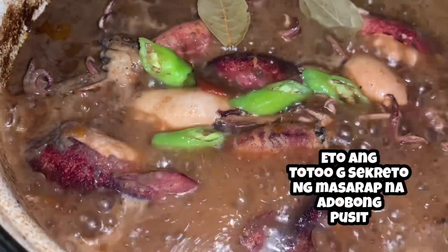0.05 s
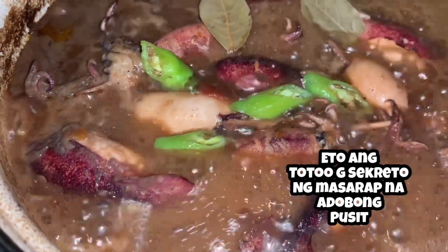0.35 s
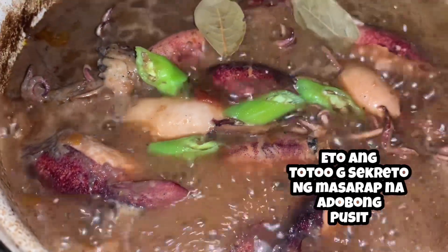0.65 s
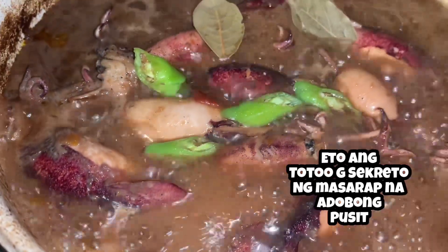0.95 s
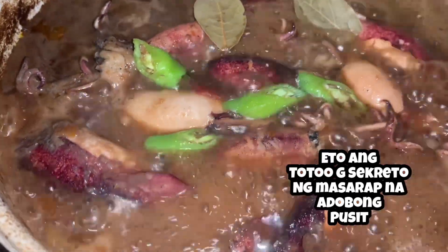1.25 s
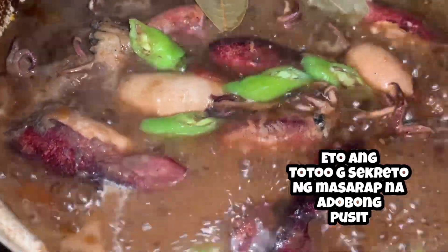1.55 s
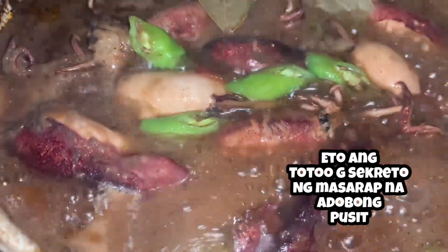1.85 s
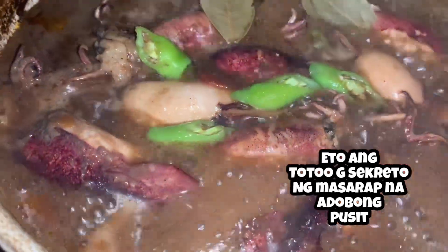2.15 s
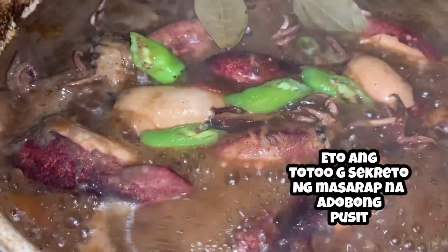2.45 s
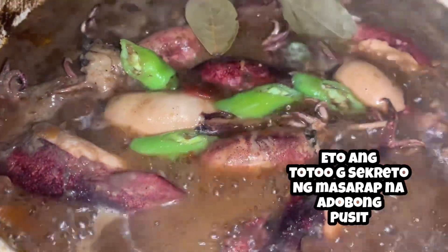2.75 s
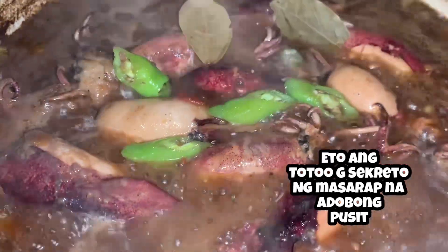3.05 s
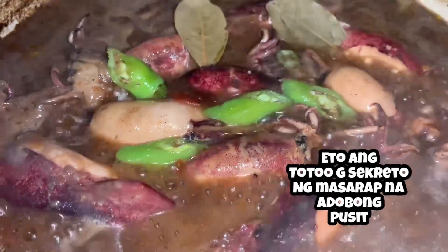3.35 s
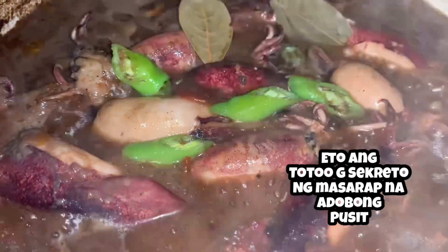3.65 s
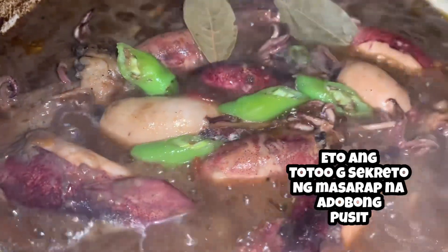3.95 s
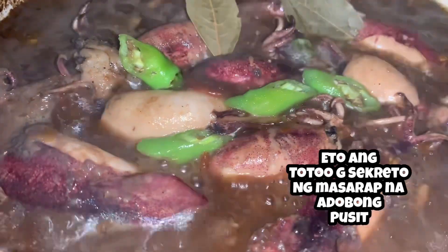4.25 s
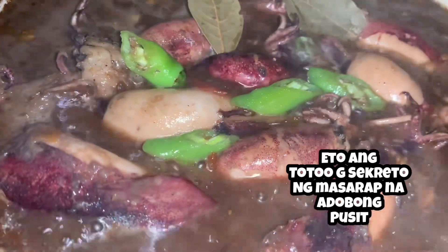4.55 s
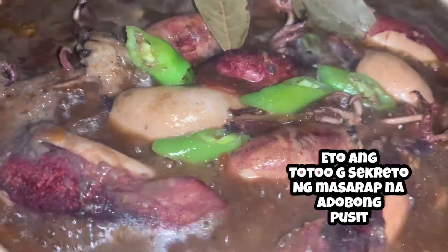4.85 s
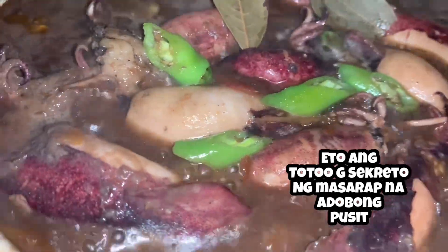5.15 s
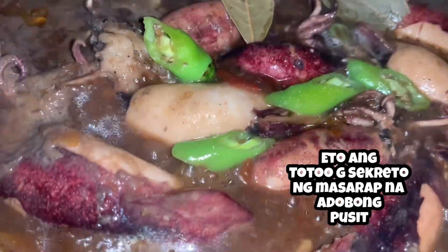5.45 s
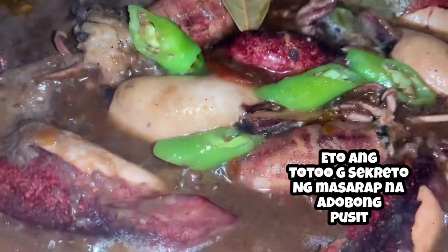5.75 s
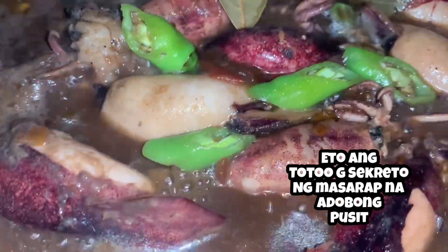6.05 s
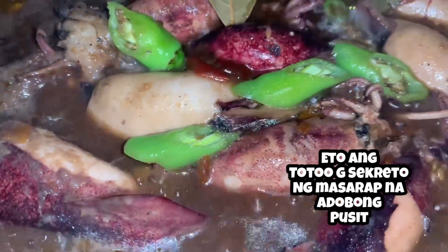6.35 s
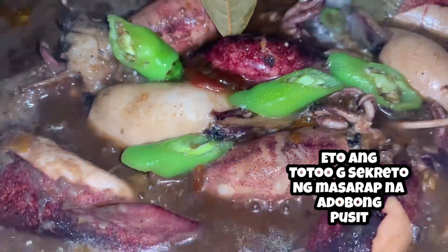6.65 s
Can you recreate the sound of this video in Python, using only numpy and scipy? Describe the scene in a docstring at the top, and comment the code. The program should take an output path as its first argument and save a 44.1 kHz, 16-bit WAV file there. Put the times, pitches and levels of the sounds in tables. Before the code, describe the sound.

A thick stew bubbles, sizzles and crackles in a metal pot, heard close up in a kitchen with little echo. A burner rumbles low throughout, humming slightly in the first second. Wet pops stand out from the boil at first. At 0.8 seconds a utensil clinks once on the pot with a short, bright ring. Around 1.3 seconds steam gushes through the sauce in a quick run of soft, deep thumps and pops. From about 2 seconds the boil eases and the bubbling thins, leaving a faint hollow steam sound and tiny sharp spits. Single soft puffs come near 3.2 and 4.3 seconds. From 4.6 seconds one spot in the sauce blurps and gurgles quietly, nearly four times a second, until the end at about 6.8 seconds. At 6.5 seconds a small, faint jet of steam sputters out.

```python
"""A stew bubbles, sizzles and crackles in a metal pot over a rumbling burner, close to two microphones.
At 0.8 s a utensil clinks on the pot, and at 1.3 s steam gushes through the sauce with soft thumps.
The bursting bubbles then thin out as the boil eases. From 4.6 s one vent in the sauce blurps and
gurgles at a nearly even pace, and at 6.5 s a small jet of steam escapes."""
import sys
import numpy as np
from scipy import signal
from scipy.fft import rfft, irfft, next_fast_len
from scipy.io import wavfile

SR = 44100
rng = np.random.default_rng(int(sys.argv[2]) if len(sys.argv) > 2 else 0)


def log_audio(samples):
    """Write samples as a 16-bit WAV file to the path given in sys.argv[1]."""
    # one column per channel
    frames = np.atleast_2d(samples).T
    # limit to full scale, then quantise
    limited = np.clip(frames, -1, 1)
    pcm = np.round(limited * 32767).astype(np.int16)
    wavfile.write(sys.argv[1], SR, pcm)


N = 300302
TIME = np.arange(N) / SR


# How hard the sauce bubbles, stalling and picking up again: time_s, level_db
SAUCE_LEVEL = [(0, -46.5), (1.35, -49.5), (2.1, -53), (2.8, -56.5), (3.2, -63), (3.7, -71.5), (4.25, -66.5),
               (4.6, -63.5), (5.0, -61), (5.4, -62.5), (6.1, -63), (6.81, -67.5)]
# Its tone, from low to high: frequency_hz, level_db
SAUCE_TONE = [(120, -11), (250, -2.5), (320, 3.5), (400, 0.5), (520, 3), (680, 3.5), (850, -1),
              (1300, -3.5), (2000, -5.5), (3000, -27), (5000, -60), (9000, -48)]
def bubbling():
    """Thick sauce cuts each bubble's ring short; a soft wash seethes underneath."""
    bubbles = swarm(np.linspace(280, 2800, 20), per_s=1300, spread_db=2, cycles=1.3, scatter_s=0.00019)
    sauce = coloured(bubbles, SAUCE_TONE) + amp(-2) * coloured(pair_noise(apart_db=6), SAUCE_TONE)
    sauce = patchy(sauce, depth_db=3, width_hz=180, length_s=0.078)
    return amp(2.5) * follow(SAUCE_LEVEL) * level_changes() * sauce


# The sound's level briefly swells, or drops out for a moment: middle_s, half_length_s, change_db
LEVEL_CHANGES = [(0.656, 0.025, 2.5), (1.292, 0.037, 2), (1.392, 0.023, 5), (2.964, 0.031, -17),
                 (4.228, 0.019, -15), (4.4, 0.025, -12), (4.542, 0.027, 4), (5.43, 0.05, 2.5)]
def level_changes():
    """These brief changes as one volume curve."""
    return amp(sum(db * hump(middle, half, power=4) for middle, half, db in LEVEL_CHANGES))


# Strength of the boil, easing as the pot cools: time_s, level_db
BOIL_LEVEL = [(0.0, -53), (1.42, -56), (2.43, -59.5), (5.31, -67.5), (6.54, -66.5), (6.81, -68)]
# Tone of the sizzle: frequency_hz, level_db
SIZZLE_TONE = [(700, -40), (1300, 10.5), (2000, 3), (3000, 5.5), (4000, 6), (5500, 5), (7500, 0),
               (9000, -3), (10800, -4.5), (13000, -4.5), (15500, -2.5), (17000, -1.5)]
def sizzle(full_boil_db=-55.5):
    """Countless tiny bubbles merge into a hiss, with short wet crackles in it."""
    boil = follow(BOIL_LEVEL) / amp(full_boil_db)
    crackles = swarm(np.linspace(1500, 5000, 10), per_s=500, spread_db=4, cycles=1.04, scatter_s=3e-5)
    hiss = coloured(pair_noise(apart_db=-42.5), SIZZLE_TONE)
    sound = patchy(unit(hiss + amp(-15) * unit(crackles)), depth_db=2.4, width_hz=500, length_s=0.07)
    return amp(-48.5 + 1.9 * wander(rate_hz=30)) * boil ** 1.12 * level_changes() ** 0.24 * sound


# Crackle of the finest bubbles, strongest at a medium boil: time_s, level_db
FIZZ_LEVEL = [(0, -64.5), (1.2, -56.5), (2.8, -58), (3.9, -66.5), (5.1, -73.5), (6.81, -80)]
# Its tone: frequency_hz, level_db
FIZZ_TONE = [(1500, -19.5), (3500, 2), (5500, 3), (7500, 4.5), (9000, -17), (10800, 8), (13000, 3),
             (15500, 9), (17000, -12.5)]
def fizz():
    """Tiny bubbles crackle in clumps: an even fizz when strong, a few uneven ticks when weak."""
    level = follow(FIZZ_LEVEL)
    strength = level / level.mean()
    clumps = amp(3.3 * wander(rate_hz=21))
    clicks = swarm(np.linspace(4500, 16000, 20), per_s=1200 * strength * clumps,
                   spread_db=3.1 - 0.6 * np.log(strength), cycles=1, scatter_s=1e-5)
    return amp(5) * level.mean() * coloured(clicks * np.sqrt(clumps * strength), FIZZ_TONE)


# Wet pops that stand out of the sauce: start_s, level_db, pitch_hz
POPS = [(0.095, -37, 1270), (0.202, -30, 1310), (0.369, -32, 1600), (0.48, -33, 1440), (0.5495, -33, 1280),
        (0.629, -32, 1360), (1.1, -34.5, 1200), (1.211, -31.5, 1440), (1.258, -32, 993), (1.29, -26, 902),
        (1.323, -28, 950), (1.356, -37, 1240), (1.377, -28, 945), (1.794, -39, 1260), (2.572, -39, 1540),
        (4.036, -45.5, 1630), (4.447, -48.5, 1540), (4.4945, -42, 1580), (4.539, -44, 1310),
        (5.168, -55, 1050), (5.188, -43, 1050), (5.279, -53, 1040), (6.067, -46, 1320)]
def pops(snap_s=0.0015, mist_s=0.0051):
    """A bubble's skin tears with a snap, followed by a fainter mist of droplets."""
    out, t = np.zeros((2, N)), np.arange(400) / SR
    fade = amp(-4) * np.exp(-t / snap_s) + amp(-17) * np.exp(-t / mist_s)
    for start, db, hz in POPS:
        spray = rng.standard_normal(len(t)) * fade
        spray[0] = 1
        pop = signal.fftconvolve(bubble(hz, cycles=0.57), spray[None], axes=1)
        add(out, start, amp(db + 1.5) * pop / abs(pop).max())
    return out


# The sharpest snaps of tiny bubbles: start_s, level_db, pitch_hz
SPITS = [(0.101, -38.5, 8050), (0.276, -39.5, 8400), (0.3388, -35.5, 8800), (0.4767, -34.5, 9840),
         (0.6287, -46, 5700), (0.761, -37.0, 8400), (1.21, -40, 10800), (1.3045, -50, 6700),
         (1.3856, -41, 13600), (1.4584, -42, 12700), (1.599, -44, 8100), (1.6984, -37, 12100),
         (1.9538, -37, 10500), (2.0612, -37.5, 12200), (2.3328, -41, 13100), (2.588, -47, 9600),
         (2.6371, -47, 11200), (2.7738, -37, 7250), (2.8363, -39, 13000), (2.8635, -38.0, 13800),
         (3.0216, -34, 12000), (3.0467, -40, 9400), (3.1367, -40, 7900), (3.1483, -41, 13800),
         (3.224, -41.0, 12600), (3.452, -46, 8950), (3.487, -40, 9300), (3.5217, -38.5, 6640),
         (3.5525, -48, 11800), (3.5579, -37.5, 6540), (3.5631, -50, 12700), (3.5836, -41, 12700),
         (3.5945, -45, 8200), (3.6266, -41.5, 12600), (3.782, -47, 13000), (3.7857, -44, 13200),
         (3.8009, -50, 12800), (3.8419, -42.5, 11700), (3.899, -38.5, 6960), (3.9659, -45, 11000),
         (4.004, -37, 7200), (4.181, -37.5, 12200), (4.2112, -45, 6200), (4.2265, -43, 12500),
         (4.2716, -44.5, 11800), (4.3136, -43, 7700), (4.3671, -46, 14700), (4.498, -44.5, 5840),
         (4.6338, -41, 10900), (4.6559, -43, 13200), (4.7242, -43, 9800), (4.7324, -39.5, 7500),
         (4.805, -47, 10100), (4.9045, -39.5, 12700), (5.1494, -51, 8700), (5.1874, -43.5, 11200),
         (5.2296, -50, 12700), (5.3879, -42.5, 9200), (5.4345, -46.5, 12200), (5.4494, -47, 13100),
         (5.4651, -54, 12900), (5.542, -38, 8800), (5.5987, -48, 14300), (5.6809, -41.5, 9600),
         (5.761, -40, 6100), (5.824, -44.5, 14400), (5.9193, -46, 14200), (5.9545, -39, 10600),
         (6, -52, 7220), (6.1185, -45.0, 13200), (6.1849, -41.0, 8800), (6.294, -48, 11900),
         (6.336, -45, 14600), (6.36, -43, 9100), (6.4055, -43, 10300), (6.4662, -43.5, 12200),
         (6.5777, -51, 14300), (6.6251, -44, 11200), (6.635, -45, 5500)]
def spits(snap_s=0.00015, mist_s=0.003, blur_per_s=350, blur_s=0.012, echo_s=0.0022, scatter_s=1.2e-5):
    """A sharp tick with a faint crackly blur around it; mist follows, and the pot wall echoes it."""
    out, t, f = np.zeros((2, N)), np.arange(-512, 1536) / SR, np.fft.rfftfreq(2048, 1 / SR)
    fade = np.exp(-abs(t) / snap_s) + amp(-22) * np.exp(-abs(t) / mist_s)
    for start, db, hz in SPITS:
        spray, chance = rng.standard_normal(len(t)), rng.random(len(t))
        side, wall = rng.uniform(-1, 1, 2)
        snap = 2 * (t == 0) + (t > 0) * spray * fade
        blur = (chance < blur_per_s / SR) * spray * amp(-9) * np.exp(-abs(t) / blur_s)
        band = (f < TOP_HZ) / (1 + (2 * np.log((f + 1) / hz)) ** 2)
        # Give every snap the same energy before its own level is set.
        scale = np.sqrt(SR / 2000) / np.linalg.norm(irfft(rfft(snap) * band))
        echo = amp(-12) * np.exp(-2j * np.pi * f * echo_s * (1 + wall / 2))
        right_delay = np.exp(-2j * np.pi * f * np.array([[0], [side * scatter_s]]))
        tick = irfft(rfft(snap + 2 * blur) * band * (1 + echo) * right_delay)
        add(out, start + t[0], amp(db + 0.8) * scale * tick)
    return out


# Large bubbles letting out steam: time_s, level_db, pitch_hz
PUFFS = [(1.244, -18, 137), (1.2685, -20.5, 169), (1.295, -18.5, 250), (1.303, -18.5, 119),
         (1.313, -21, 170), (1.3295, -17, 213), (1.383, -15.5, 260), (1.3873, -14, 114),
         (1.398, -13.5, 67.5), (1.967, -34, 188), (3.148, -33, 140), (3.1724, -20.5, 447),
         (3.1735, -28, 211), (3.177, -26, 100), (3.389, -42.5, 296), (3.648, -33.5, 218),
         (4.3336, -32.5, 290), (4.3395, -22, 131)]
def puffs(events=PUFFS, length_cycles=0.71, sag_cycles=3, right_lead_s=0.00015, swirl_s=0.012):
    """Each puff is a short push of air whose pitch sags, with a brief noisy swirl behind it."""
    out, t = np.zeros((2, N)), np.arange(SR // 10) / SR
    for when, db, hz in events:
        turns = np.arange(-2, 2, hz / SR) + np.array([[0], [right_lead_s * hz]])
        sagging = sag_cycles * (1 - np.exp(-turns / sag_cycles))
        push = -np.exp(-(turns / length_cycles) ** 2) * np.sin(2 * np.pi * sagging)
        add(out, when - 2 / hz, amp(db) * push)
        noise = pair_noise(apart_db=-4, size=len(t))
        swirl = unit(filtered(noise, lambda f: (f / hz) / (1 + (f / hz) ** 4)))
        add(out, when, amp(db - 18) * swirl * np.exp(-t / swirl_s))
    return out


# Blurps from one vent in the sauce: time_s, level_db, pitch_hz
BLURPS = [(4.579, -44, 277), (4.862, -42, 355), (5.105, -48, 330), (5.368, -42, 387), (5.635, -44, 260),
          (5.887, -39, 258), (6.177, -39, 302), (6.439, -43, 230), (6.714, -43.5, 241)]
def blurps():
    """The vent lets out one small puff after another."""
    return puffs(BLURPS)


# Tone of the gurgle around each blurp: frequency_hz, level_db
GURGLE_TONE = [(130, -3), (220, -7), (420, 11), (650, -4), (1000, -5), (1800, -19)]
# Pockets of steam under the food: middle_s, half_length_s, level_db, pitch_hz, width_hz
STEAM_POCKETS = [(0.551, 0.0037, -38, 900, 1000), (0.656, 0.03, -39.5, 1140, 880),
                 (0.657, 0.014, -45, 3050, 1500), (1.298, 0.057, -42.5, 990, 260),
                 (5.183, 0.025, -58, 1140, 500), (5.284, 0.03, -60, 1130, 400),
                 (5.429, 0.021, -51.5, 477, 110), (5.51, 0.06, -64, 750, 500)]
def gurgle(late_s=0.012):
    """Each blurp stirs up smaller bubbles and spray; pockets of steam sputter on their own."""
    stirred = sum(amp(db) * hump(when + late_s, half_s=0.024) for when, db, _ in BLURPS)
    bubbles = swarm(np.geomspace(200, 1100, 10), per_s=1200, spread_db=0, cycles=1, scatter_s=0.00016)
    spray = pair_noise(apart_db=3) * amp(14 - 2.5 * wander(rate_hz=85))
    froth = unit(bubbles) + spray
    out = amp(-15) * stirred * coloured(froth, GURGLE_TONE)
    for middle, half, db, hz, width in STEAM_POCKETS:
        sputter = unit(filtered(froth, lambda f: 1 / (1 + (2 * (f - hz) / width) ** 4)))
        out += amp(db) * hump(middle, half) * sputter
    return out


# The deep throb of the gush: frequency_hz, level_db
GUSH_TONE = [(30, -12), (60, -0.5), (130, -7.5), (200, -6.5), (300, -10), (480, -8.5), (1000, -42),
             (2500, -60)]
def gush():
    """Steam heaves through the sauce in a quick run of large, soft bubbles."""
    bubbles = swarm(np.geomspace(70, 320, 5), per_s=270, spread_db=2, cycles=0.99, scatter_s=0.00015)
    return amp(-25.5) * hump(middle_s=1.32, half_s=0.068, power=4) * coloured(bubbles, GUSH_TONE)


# A faint metallic rise leads into the clink: start_s, level_db, brightness_hz, rise_s
CLINK_PARTS = [(0.805, -12, 5000, 0.0017), (.8115, -5.5, 7500, 0.00072), (0.8162, 1, 14000, 0.00014),
               (0.8184, -1.5, 20000, 0.00027), (0.8222, -13, 30000, 0.00021)]
# Notes the metal rings with (a fade is a fall of 60 dB): pitch_hz, level_db, fade_s
METAL_NOTES = [(2090, -11, 0.063), (2300, -20.5, 0.07), (2734, -5.5, 0.026), (2805, 2.5, 0.03),
               (2790, -25, 0.28), (3460, -22, 0.19), (3707, -4, 0.06), (4470, -16, 0.06),
               (5460, -13.5, 0.13), (5940, -15.5, 0.088), (6060, -14.5, 0.11), (6400, -16.5, 0.12),
               (6975, -15, 0.13), (7740, 2, 0.059), (8440, -12.5, 0.055), (8796, -19.5, 0.063),
               (10150, -17.5, 0.06), (11740, -9.5, 0.045), (14440, 1.5, 0.06), (14700, -9, 0.046),
               (15400, 6, 0.055)]
# The noisy clash under those notes: frequency_hz, level_db
CLASH_TONE = [(300, -30), (1000, -11.5), (2000, 1), (3300, -13), (4200, 5), (6500, 5), (8000, 5.5),
              (10000, 6), (12500, 5.5), (15700, -4), (17500, -29)]
# The dull knock of the full pot: frequency_hz, level_db
KNOCK_TONE = [(100, -30.5), (330, 4.5), (700, 3.5), (1100, -1), (1900, -6), (3200, -22), (8000, -48)]
def clink(clash_fade_s=0.036, echo_fade_s=0.2, knock_rise_s=0.0058, knock_fade_s=0.12, detune=0.012):
    """A utensil strikes the pot: the metal rings, with a clash that echoes inside and a dull knock."""
    out, t = np.zeros((2, N)), np.arange(SR // 4) / SR
    clash_shape = amp(-60 * t / clash_fade_s) + amp(-19 - 60 * t / echo_fade_s)
    knock_shape = (1 - np.exp(-t / knock_rise_s)) * amp(-60 * t / knock_fade_s)
    for start, db, bright_hz, rise_s in CLINK_PARTS:
        ring = np.zeros(len(t))
        for hz, note_db, fade_s in METAL_NOTES:
            pitch = hz * (1 + detune * rng.uniform(-1, 1))
            ring += amp(note_db - 60 * t / fade_s) * np.sin(2 * np.pi * (pitch * t + rng.random()))
        clash = clash_shape * coloured(pair_noise(apart_db=-15, size=len(t)), CLASH_TONE)
        metal = amp([[-14.06], [-14.94]]) * ring + amp(-10) * clash
        metal = filtered(metal, lambda f: 1 / np.sqrt(1 + (f / bright_hz) ** 4))
        knock = knock_shape * coloured(pair_noise(apart_db=2, size=len(t)), KNOCK_TONE)
        add(out, start, amp(db) * (metal * (1 - np.exp(-t / rise_s)) + amp(-27) * knock))
    return out


# Steam building up in the pot: time_s, level_db
STEAM_LEVEL = [(0, -94), (2.0, -57), (3.3, -55.5), (4.4, -57.5), (5.0, -62.5), (6.1, -60), (6.8, -57.5)]
# Notes of the air in the pot: pitch_hz, width_hz, level_db
POT_NOTES = [(469, 220, -4), (1040, 110, 0), (1194, 110, -9.5), (1549, 100, 7), (2130, 720, -15.5),
             (3450, 600, -15.5)]
def pot_steam():
    """Steam stirs the air above the sauce into a hollow, breathy sound."""
    hollow = patchy(ringing_air(POT_NOTES), depth_db=1.5, width_hz=480, length_s=0.09)
    return follow(STEAM_LEVEL) * level_changes() ** 0.13 * hollow


# Notes of the steam jet: pitch_hz, width_hz, level_db
JET_NOTES = [(2830, 280, 0), (3210, 270, 0), (4030, 650, -3)]
def steam_jet(start_s=6.51, rise_s=0.027, hold_s=0.14, fall_s=0.14):
    """A small jet of steam sputters out from under the food."""
    opening = np.interp(TIME, np.cumsum([start_s, rise_s, hold_s, fall_s]), [0, 1, 1, 0])
    return opening * amp(-64 + 2.6 * wander(rate_hz=90)) * ringing_air(JET_NOTES)


# Strength of the burner's rumble: time_s, level_db
RUMBLE_LEVEL = [(0.0, -36.5), (0.49, -35), (0.78, -41.5), (1.01, -41), (1.35, -34.5), (1.93, -44.5),
                (2.45, -40.5), (3.79, -45), (6.81, -42)]
# Its tone: frequency_hz, level_db
RUMBLE_TONE = [(20, -50.5), (32, -25), (45, 1.5), (60, -2), (85, 4.5), (115, -0.5), (150, -10.5),
               (200, -15.5), (280, -27), (450, -46.5), (1000, -65)]
# Hums of the strong flame: start_s, end_s, pitch_hz, level_db
FLAME_HUMS = [(-0.067, 0.57, 113, -35.5), (0.3, 0.78, 89, -36.5), (-0.057, 0.96, 291, -54)]
def burner(edge_s=0.06, waver=0.013):
    """The flame rumbles throughout and hums a few wavering notes in the first second."""
    sound = amp(4) * follow(RUMBLE_LEVEL) * coloured(pair_noise(apart_db=-17), RUMBLE_TONE)
    for start, end, hz, db in FLAME_HUMS:
        held = (np.tanh((TIME - start) / edge_s) - np.tanh((TIME - end) / edge_s)) / 2
        turns = np.cumsum(hz * (1 + waver * wander(rate_hz=18))) / SR
        sound += amp(db) * held * unit(np.sin(2 * np.pi * turns))
    return sound * amp([[0.5], [-0.5]])  # a little louder on the left


# How long the kitchen's echo takes to fall by 60 dB: frequency_hz, fade_s
ECHO_FADES = [(200, 0.28), (2000, 0.11), (8000, 0.013), (16000, 0.11)]
def kitchen(x):
    """Scattered echoes come back from the room; the low ones last longest."""
    echoes = rng.standard_normal((2, SR // 2)) * (rng.random((2, SR // 2)) < 0.15)
    echoes[:, :150] = 0  # a gap before the first echo
    hz, t, bands = signal.stft(echoes, SR, nperseg=256)
    tail = signal.istft(bands * amp(-60 * t / read(ECHO_FADES, hz)[:, None]), SR, nperseg=256)[1]
    return signal.oaconvolve(x, tail / np.linalg.norm(tail[0]), axes=1)[:, :N]


def bubble(hz, cycles, lag_s=0):
    """A bursting bubble rings briefly, rising in pitch; the right side hears it lag_s later."""
    turns = np.maximum(np.arange(-16, 1500) / SR - np.array([[0], [lag_s]]), 0) * hz
    age = turns / cycles
    rising = turns * (1 + 0.03 * np.tanh(age / 2))
    ring = np.exp(-age) * (1 - np.exp(-6 * age)) * np.sin(2 * np.pi * rising)
    return ring / abs(ring).max()


def swarm(pitches, per_s, spread_db, cycles, scatter_s):
    """Bubbles of many sizes burst at random, each pitch from its own spot in the pot."""
    out = np.zeros((2, N))
    for hz in pitches:
        hit = rng.random(N) < per_s / len(pitches) / SR
        size = np.minimum(rng.standard_exponential(N), 4.5)
        kicks = np.zeros(N)
        kicks[hit] = amp((spread_db * size)[hit]) * np.sign(np.sin(np.flatnonzero(hit)))  # up or down
        ring = unit(bubble(hz, cycles, lag_s=scatter_s * rng.standard_normal()))
        out += signal.oaconvolve(kicks[None], ring, axes=1)[:, :N]
    return out


def patchy(x, depth_db, width_hz, length_s):
    """Spots on the surface come and go, so patches of low and high sound swell and fade."""
    hz, t, bands = signal.stft(x, SR, nperseg=2048, noverlap=1536)
    blur_hz = np.exp(-(np.fft.fftfreq(len(hz), hz[1]) * width_hz) ** 2)
    blur_s = np.exp(-(np.fft.fftfreq(len(t), t[1]) * length_s) ** 2)
    speckle = np.fft.fft2(rng.standard_normal(bands.shape[1:]))
    patches = unit(np.fft.ifft2(speckle * np.outer(blur_hz, blur_s)).real)
    return unit(signal.istft(bands * amp(depth_db * patches), SR, nperseg=2048, noverlap=1536)[1][:, :N])


def ringing_air(notes):
    """Rushing air, loudest around the given notes."""
    def response(f):
        return sum(amp(db) / (1 + (2 * (f - hz) / width) ** 2) for hz, width, db in notes)
    return unit(filtered(pair_noise(apart_db=20), response))


def pair_noise(apart_db, size=N):
    """Noise shared by left and right, plus some of their own at apart_db."""
    return unit(rng.standard_normal(size) + amp(apart_db) * rng.standard_normal((2, size)))


def wander(rate_hz):
    """A smooth random wobble."""
    return unit(filtered(rng.standard_normal(N), lambda hz: 1 / (1 + (hz / rate_hz) ** 4)))


def hump(middle_s, half_s, power=2):
    """One rise and fall; a higher power flattens its top."""
    return np.exp(-((TIME - middle_s) / half_s) ** power)


def amp(db):
    """Turns decibels into a multiplier."""
    return 10 ** (np.asarray(db) / 20)


def unit(x):
    """Scales to an average strength (rms) of 1."""
    return x / np.sqrt(np.mean(x ** 2) + 1e-20)


def follow(curve):
    """Turns a level curve into a multiplier for every sample."""
    return amp(np.interp(TIME, *np.transpose(curve)))


def read(points, hz):
    """Looks up a table by frequency, with octaves evenly spaced."""
    f, value = np.transpose(points)
    return np.interp(np.log(hz + 1), np.log(f + 1), value)


def filtered(x, response):
    """Multiplies each frequency by response(frequency)."""
    size = next_fast_len(x.shape[-1] + 2048)
    return irfft(rfft(x, size) * response(np.fft.rfftfreq(size, 1 / SR)), size)[..., :x.shape[-1]]


def coloured(x, tone):
    """Shapes a sound with a tone table, at strength 1."""
    return unit(filtered(x, lambda hz: amp(read(tone, hz))))


def add(mix, start_s, sound):
    """Mixes a stereo sound in at start_s."""
    part = mix[:, max(round(start_s * SR), 0):][:, :sound.shape[1]]
    part += sound[:, :part.shape[1]]


# How far the right microphone's wave trails the left one's: frequency_hz, lag_radians
RIGHT_LAG = [(0, 0), (650, -.5), (1300, 0), (2500, 1.3), (3600, 1.7), (4700, 3.14), (6900, 6.28),
             (9050, 9.42), (11150, 12.57), (13200, 15.7), (15200, 18.85), (16500, 19.5)]
def scene():
    """The pot and the kitchen around it, heard from left and right."""
    popping = pops()
    stew = bubbling() + sizzle() + fizz() + popping + spits()
    utensil = clink()
    mix = stew + utensil + burner() + pot_steam() + steam_jet() + puffs() + blurps() + gush() + gurgle()
    left, right = mix + amp(-17) * kitchen(stew) + amp(-15) * kitchen(utensil)
    right = filtered(right, lambda hz: np.exp(-1j * np.interp(hz, *np.transpose(RIGHT_LAG))))
    return np.array([left * amp(-2.53), right * amp(-2.26)])


# How the microphones colour high sounds: frequency_hz, change_db
MIC_TONE = [(2000, 0.5), (4000, 1), (7000, -1), (8600, -0.5), (9500, 0), (10200, 2.5), (10900, -5),
            (12000, 0), (13800, 1), (15500, 1)]
TOP_HZ = 15850
def record(dry):
    """The microphones colour the sound, and everything above TOP_HZ is cut."""
    heard = filtered(dry, lambda hz: amp(read(MIC_TONE, hz)))
    high_cut = signal.firwin(511, TOP_HZ, window=("kaiser", 9), fs=SR)
    return signal.oaconvolve(heard, high_cut[None], "same")


dry = scene()
out = record(dry)
log_audio(out)
```